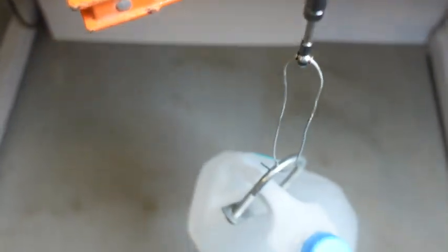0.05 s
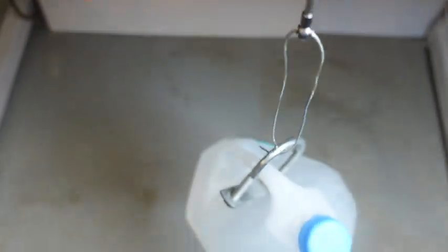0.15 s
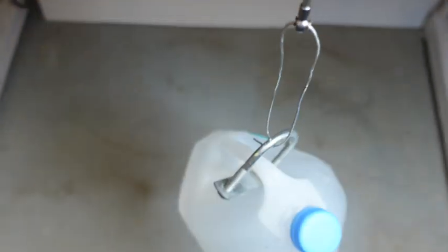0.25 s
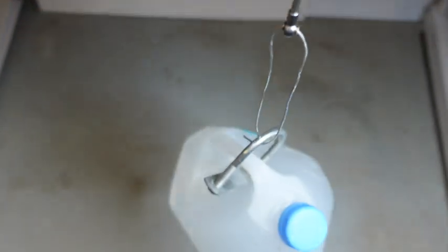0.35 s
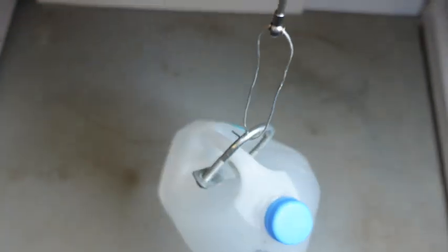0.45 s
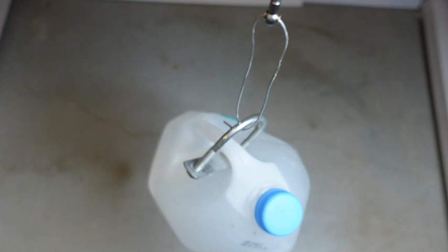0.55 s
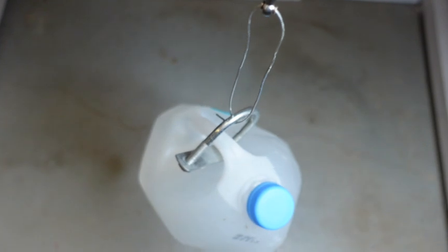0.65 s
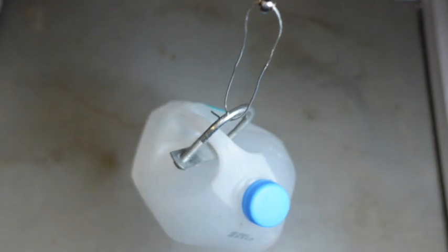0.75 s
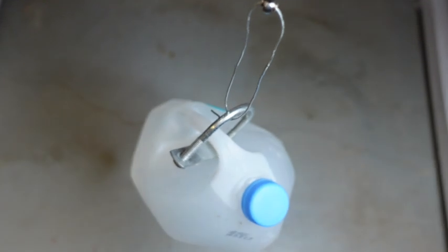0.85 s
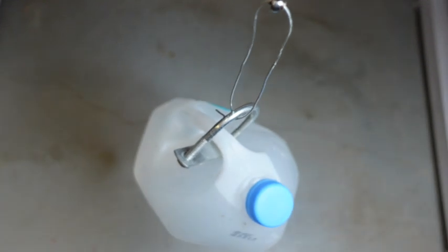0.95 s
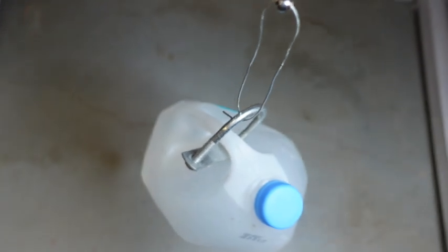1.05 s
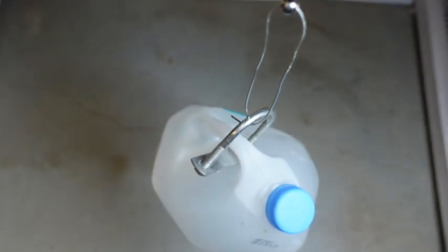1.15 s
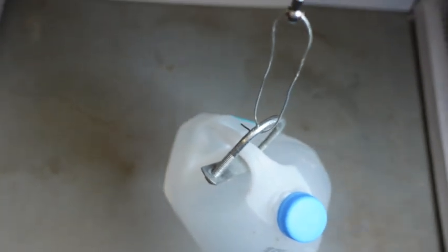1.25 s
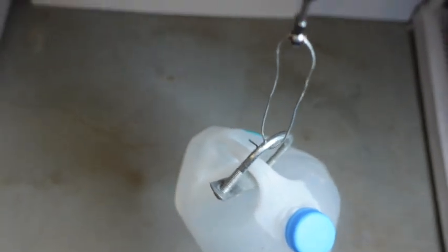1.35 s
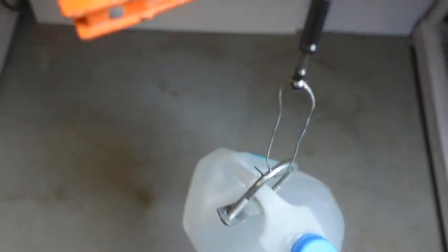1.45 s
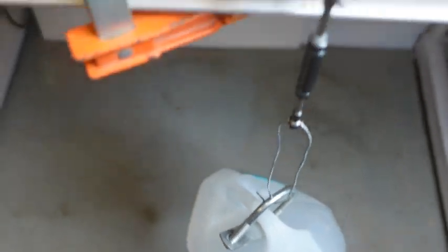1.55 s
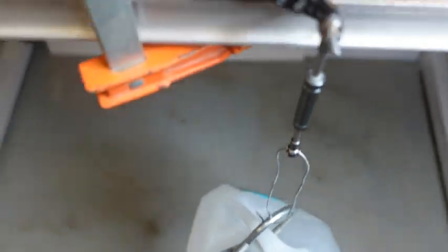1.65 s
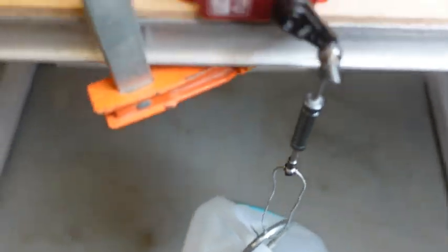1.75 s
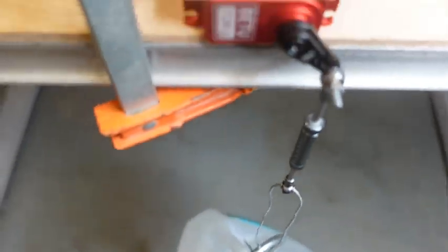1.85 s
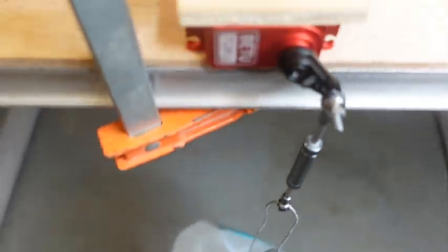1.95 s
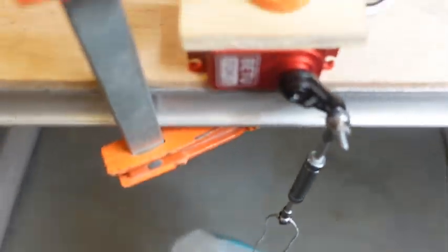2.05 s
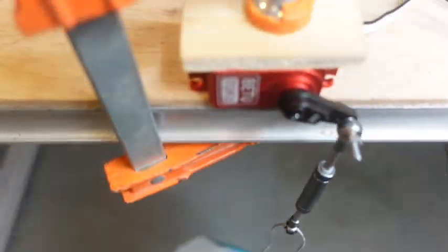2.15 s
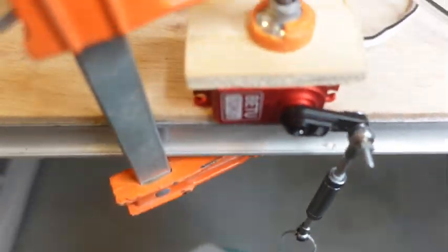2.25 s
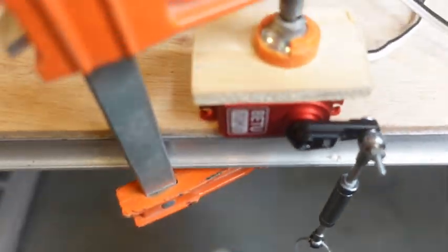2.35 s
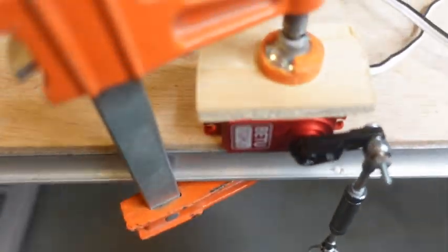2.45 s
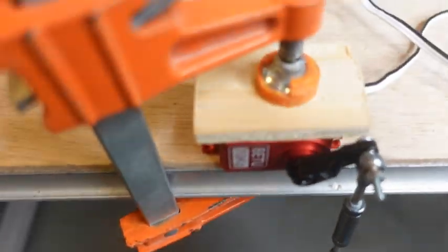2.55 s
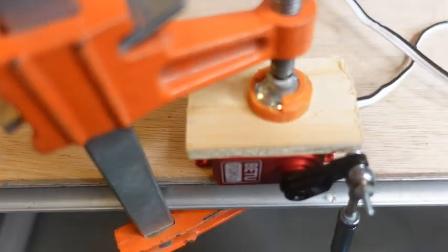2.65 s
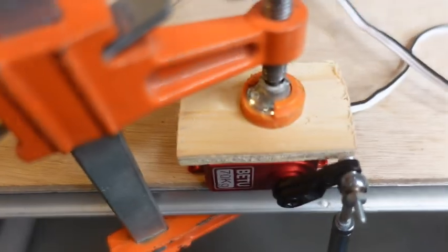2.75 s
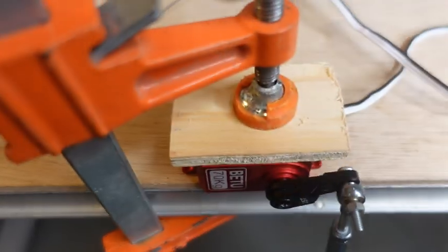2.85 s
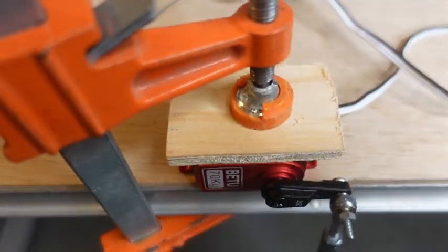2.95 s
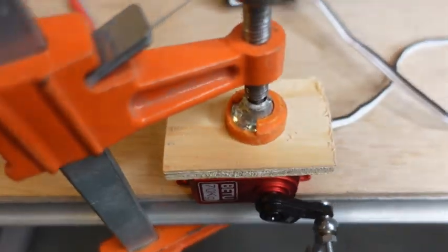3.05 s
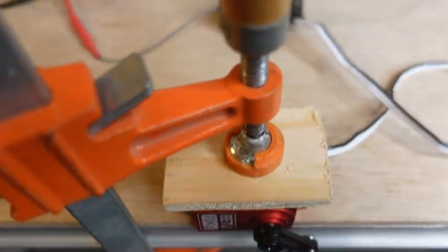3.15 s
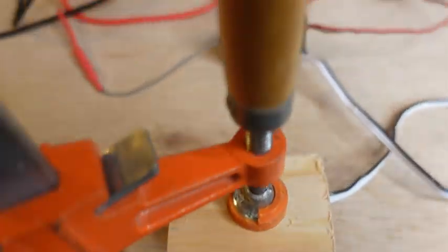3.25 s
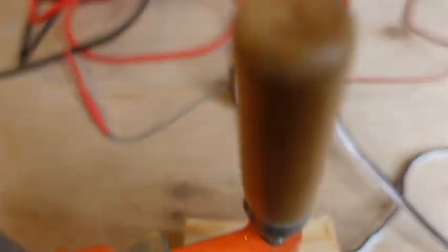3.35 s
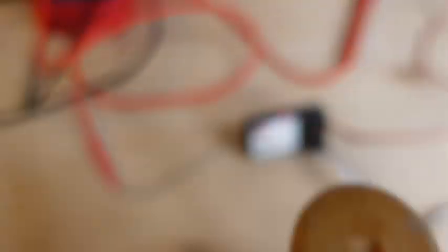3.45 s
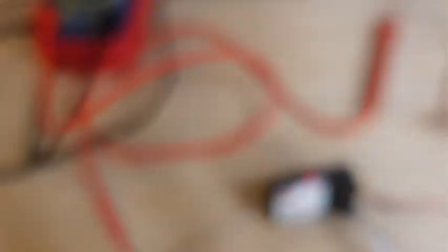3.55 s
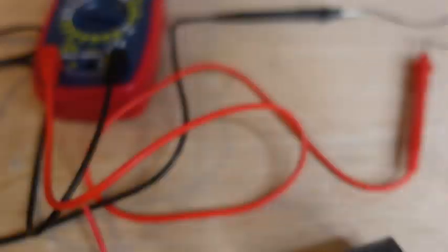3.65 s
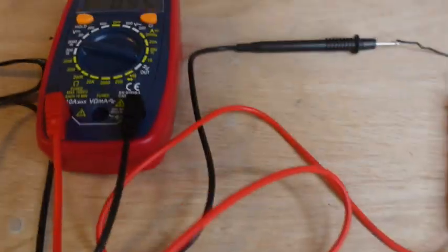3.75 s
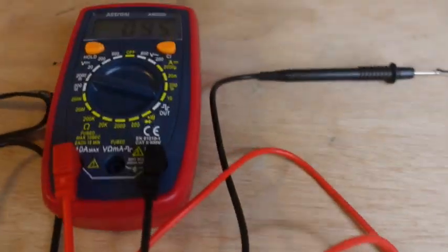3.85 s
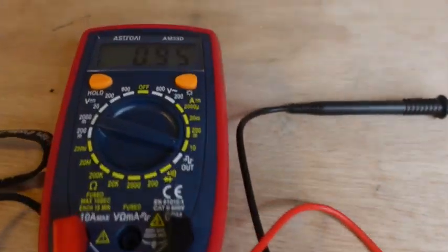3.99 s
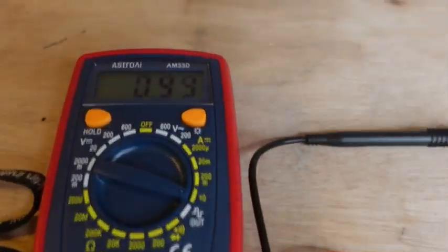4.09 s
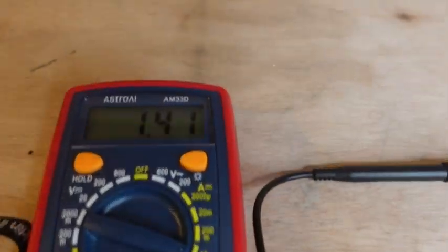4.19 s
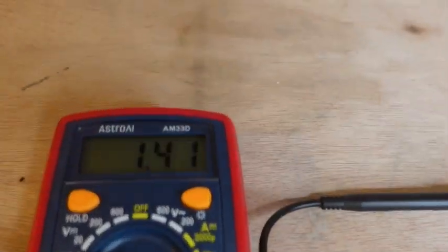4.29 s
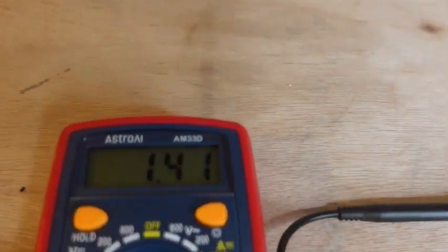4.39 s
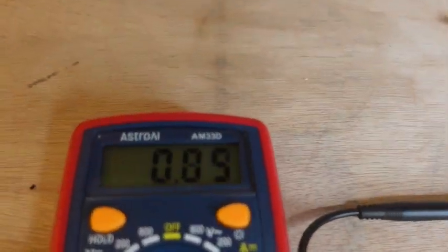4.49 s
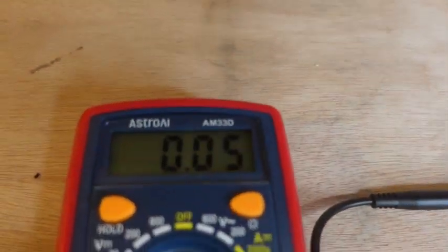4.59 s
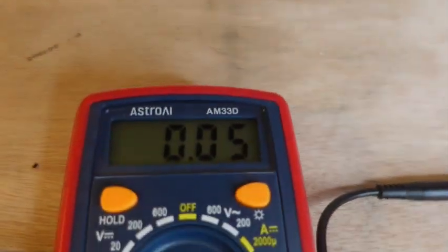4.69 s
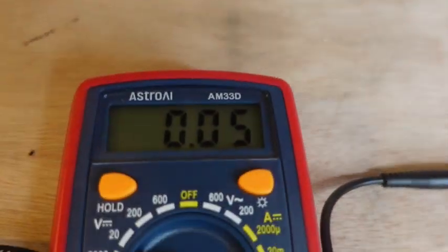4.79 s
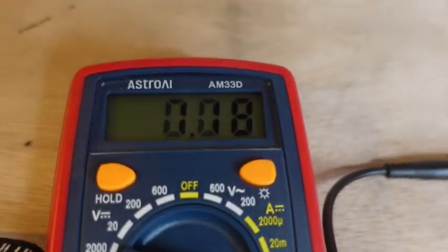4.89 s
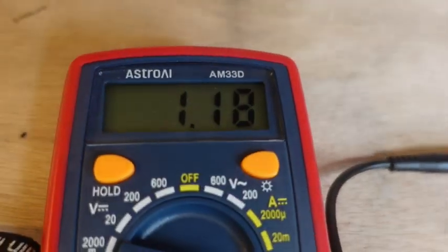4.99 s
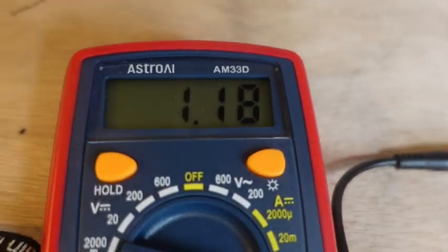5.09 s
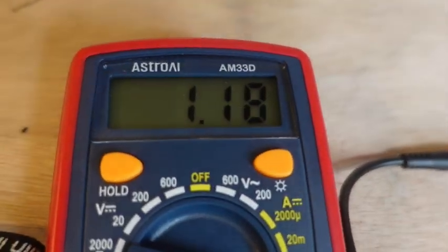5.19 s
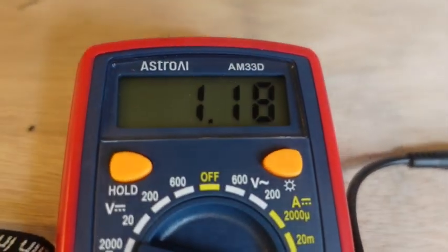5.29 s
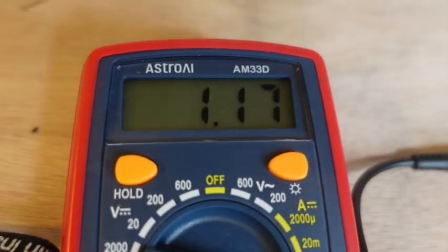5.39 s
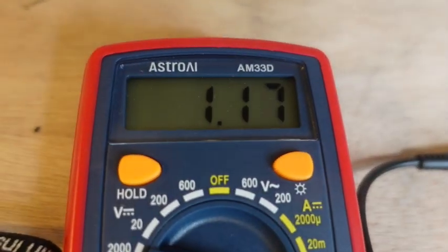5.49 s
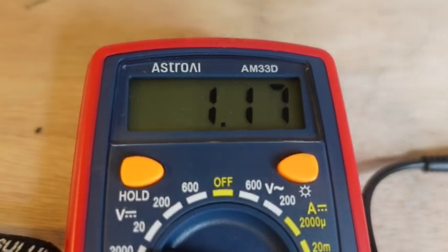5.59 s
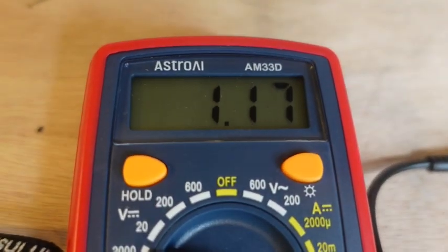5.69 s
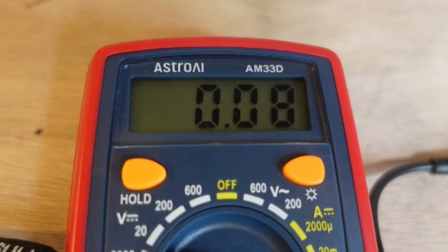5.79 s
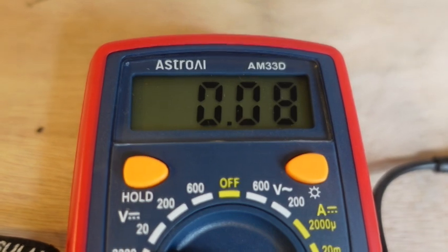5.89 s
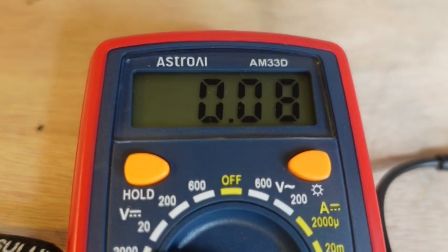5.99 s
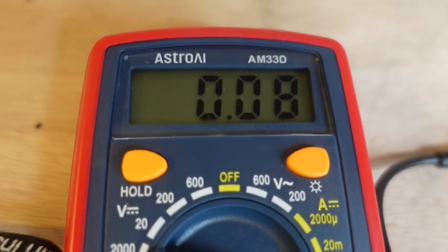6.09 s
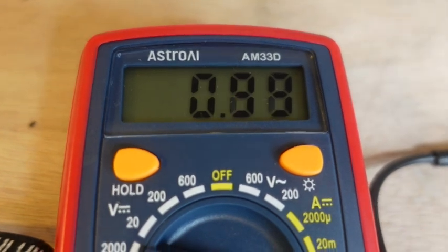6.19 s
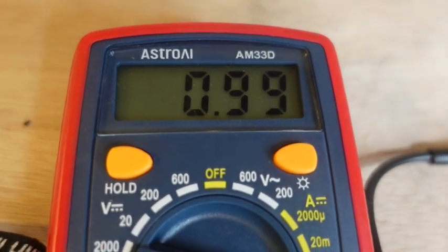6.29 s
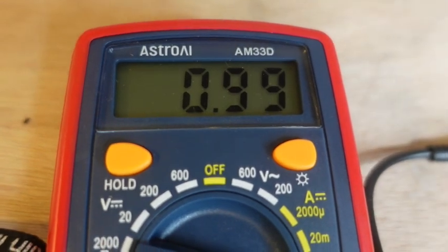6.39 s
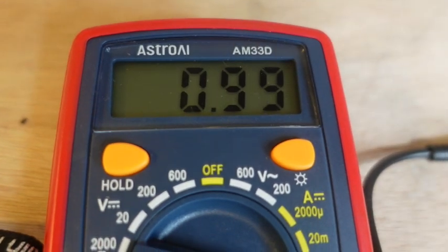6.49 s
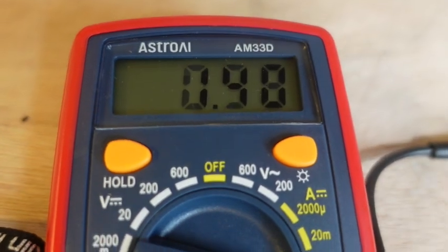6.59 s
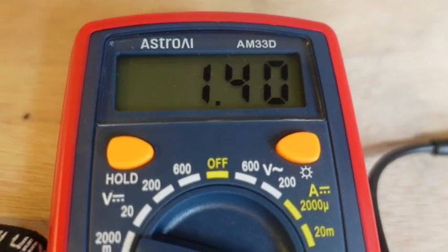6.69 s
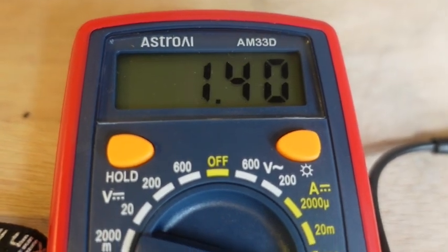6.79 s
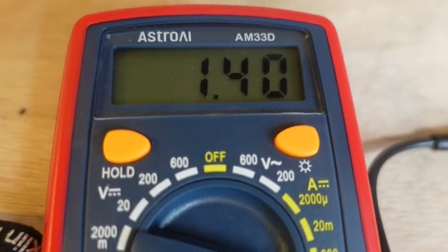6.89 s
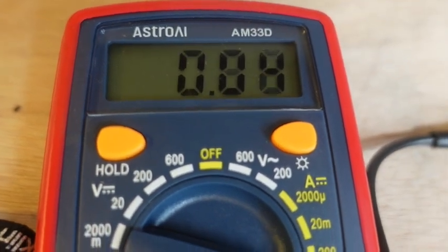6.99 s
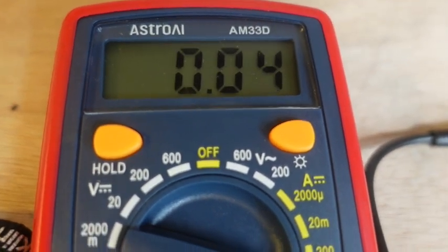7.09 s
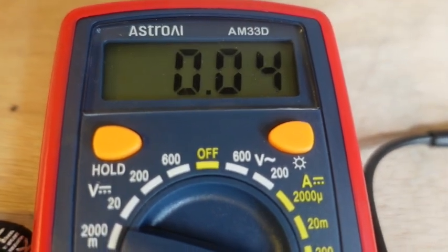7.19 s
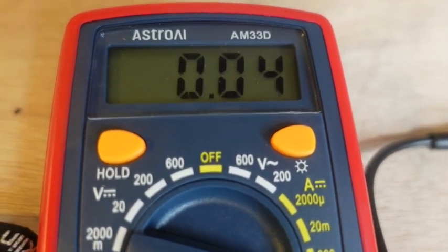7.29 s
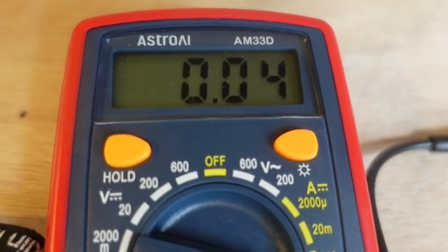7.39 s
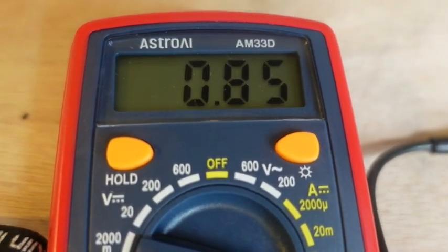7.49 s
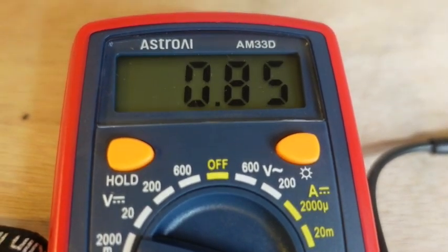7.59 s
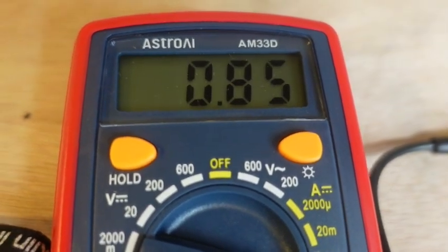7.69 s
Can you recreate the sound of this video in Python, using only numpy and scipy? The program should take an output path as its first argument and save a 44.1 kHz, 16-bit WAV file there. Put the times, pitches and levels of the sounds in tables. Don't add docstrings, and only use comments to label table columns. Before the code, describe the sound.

Close in a small workshop, a clamped servo makes quick gritty whirrs, about half a second each, lifting and lowering a water jug. Lowerings zip up high and chatter in two surges; lifts grind steadier and lower. Tiny gear clicks precede strokes, the bench hums faintly, and a thin squeal sits near the top of hearing. Halfway, the microphone turns away and the case tone changes.

```python
import sys
import numpy as np
from scipy import signal
from scipy.fft import rfft, irfft, next_fast_len
from scipy.io import wavfile
from scipy.ndimage import uniform_filter1d

SR = 44100
rng = np.random.default_rng(int(sys.argv[2]) if len(sys.argv) > 2 else 0)


def generate_wav(signal):
    frames = np.transpose(np.atleast_2d(signal))
    scaled = np.clip(frames, -1, 1) * 32767
    pcm = np.round(scaled).astype(np.int16)
    wavfile.write(sys.argv[1], SR, pcm)


def decibels_to_gain(level_db):
    exponent = np.asarray(level_db, float) / 20
    return 10 ** exponent


N = 341368
T = np.arange(N) / SR

# start in seconds, spin-up in seconds, stop in seconds, coasting time in seconds, level in dB.
STROKES = [(-.5, .05, -.07, .31, -22), (.14, .05, .465, .18, -17), (.81, .068, 1.305, .1, -16.5),
           (1.345, .055, 1.68, .19, -17), (1.99, .115, 2.535, .26, -15.5), (2.775, .045, 3.15, .17, -16),
           (3.35, .23, 3.965, .22, -16), (4.085, .1, 4.435, .19, -17), (4.64, .11, 5.175, .18, -13.5),
           (5.318, .04, 5.715, .2, -16), (5.962, .095, 6.495, .24, -15.5), (6.655, .04, 6.98, .18, -15.5),
           (7.245, .11, 7.9, .2, -15)]
# first surge in seconds, last surge in seconds, first surge in Hz, whine in dB.
LIFTS = [(.91, 1.29, 1800, -32.5), (2.08, 2.51, 1580, -34), (3.52, 3.93, 1520, -33),
         (4.78, 5.15, 1780, -34), (6.1, 6.49, 1780, -33), (7.38, 7.77, 1720, -33)]
# share of the lift (0 to 1), Hz.
LIFT_SPEED = [(.11, 1580), (.27, 1655), (.37, 1515), (.46, 1585), (.64, 1445), (.74, 1455), (.82, 1570),
              (.9, 1530), (1, 1630)]
# first surge in seconds, its Hz, second surge in seconds, its Hz, whine in dB.
LOWERINGS = [(.25, 3500, .375, 2950, -26), (1.41, 2700, 1.55, 2400, -32), (2.895, 2950, 3.12, 2450, -37),
             (4.215, 3400, 4.39, 3000, -34), (5.41, 2400, 5.63, 2480, -42), (6.75, 3370, 6.885, 2800, -32)]
# time in seconds, gears in dB, bench in dB, brightness in dB.
CAMERA = [
    (0, 0, -2, 1),
    (3.2, 0, 0, -3),
    (3.58, 0, 2, -5),
    (3.85, -6, 6, 3),
    (4.3, -6, 8, 4),
    (7.7, -6, 7, 7),
]
TURN_S = (3.38, 3.7)
# multiple of the tooth rate, level in dB.
OVERTONES = [(2, -3), (3, -1), (4, -13), (5, -19), (6, -6), (7, -7)]
# Hz, width in Hz, level in dB.
WALL_MODES = [(1616, 122, 0.5), (2420, 350, 2.5), (2900, 310, -5.5), (3400, 220, 3)]
# Hz, width in Hz, level in dB.
CASE_FACING = [(1600, 81, -23.5), (2300, 50, -12), (2620, 62.2, -25.5), (3530, 91, -13.5), (3563, 48, -3.5),
               (3924, 158, 2.5), (4290, 29, 3), (4730, 117, 5.5), (4936, 50, -5.5), (5500, 17, -6),
               (5920, 45, -3), (6530, 280, -3), (7414, 140, -6.5), (7960, 110, -9), (8850, 150, -26),
               (9480, 190, -20.5), (10940, 330, -25.5)]
# Hz, width in Hz, level in dB.
CASE_AWAY = [(1600, 240, -21.5), (2250, 51, -15.5), (3533, 58, -1), (3891, 19, 3), (4210, 24, 0),
             (4752, 64, 1.5), (4942, 99, -0.5), (5640, 17, -28.5), (6070, 51, -8.5), (6564, 46, -6.5),
             (7880, 60, -23.5), (7630, 120, -15.5), (8900, 40, -19), (9500, 260, -22), (11900, 700, -30)]
# Hz, level in dB.
CASE_WALL = [(290, -62), (500, -1.5), (851, -29), (914, -43), (1350, -31), (1600, -32.5), (1900, -22),
             (2760, -21.5), (3480, -9), (4770, -0.5), (5750, -11), (6740, -14), (15500, -47)]
# dB under full drive, brightness in dB.
BRIGHT_COASTING = [(-40, 8), (-20, 1), (-4, 0)]
BRAKE_DB = [-37, -40, -39, -46, -38, -42]
# time in seconds, level in dB.
HOLDING = [(0, -44), (1.3, -43), (2.2, -50), (2.8, -45), (3.6, -56), (7.74, -52)]
# Hz, width in Hz, level in dB.
BOARD_MODES = [(225, 137, 0.5), (322, 13, -16.5), (406, 17, 3.5), (576, 27, 1), (647, 46, -5.5)]
# Hz, width in Hz, level in dB.
LEG_MODES = [(100, 28, -8.5), (146, 33, 5.5)]
# Hz, width in Hz, level in dB.
PLATE_MODES = [(785, 25, -6.5), (927.6, 26, 0)]
# Hz, level in dB.
AIR = [(15, -77.5), (25, -38), (64, -12), (173, -11), (631, -15.5), (703, -15.5), (997, -15), (3170, -23),
       (4870, -19), (12800, -31), (15500, -50)]
# time in seconds, peak in dB.
TICKS = [(0.1074, -11), (0.7861, -25), (0.8064, -24), (1.8133, -33.5), (1.8694, -34), (1.9435, -25),
         (1.9809, -44), (2.0108, -22.5), (2.7536, -19), (3.3393, -25), (4.121, -19), (4.6274, -25),
         (5.9484, -46), (7.2324, -24), (7.2749, -27)]
# time in seconds, half length in seconds, level
# in dB.
RUSTLES = [
    (3.386, 0.051, -47.5),
    (4.552, 0.12, -54.5),
]
# time in seconds, peak in dB, Hz.
KNOCKS = [(4.349, -33.5, 268), (5.218, -28, 141), (6.465, -24, 159), (6.906, -30, 234.5), (7.547, -30, 135),
          (7.626, -25, 155)]

LIFT_END_HZ = 1450
DRIVE_HZ, LOOP_HZ = 15350, 250
PINION_TEETH = 11


def unit(x):
    return x / np.sqrt(np.mean(x ** 2))


def curves(table):
    s, *columns = np.transpose(table)
    return [np.interp(T, s, column) for column in columns]


def walk(rate):
    k = int(SR / rate)
    held = np.repeat(rng.standard_normal(N // k + 1), k)
    return 1.3 * uniform_filter1d(uniform_filter1d(held, k), k)[:N]


def waver(rate, depth):
    return 1 + depth * (walk(rate) + 1j * walk(rate))


def ring(x, modes):
    total = 0
    for k, (hz, width, db) in enumerate(modes):
        b, a = signal.iirpeak(hz, hz / width, SR)
        total = total + (-1) ** k * decibels_to_gain(db) * signal.lfilter(b, a, x)
    return total


def colour(x, spectrum):
    hz, db = np.transpose(spectrum)
    size = next_fast_len(N)
    log_hz = np.log(np.fft.rfftfreq(size, 1 / SR) + 1)
    return irfft(rfft(x, size) * decibels_to_gain(np.interp(log_hz, np.log(hz), db)), size)[:N]


def band(x, lo_hz, hi_hz):
    return signal.sosfilt(signal.butter(3, [lo_hz, hi_hz], "band", fs=SR, output="sos"), x)


def away():
    return np.interp(T, TURN_S, [0, 1])


def effort():
    under, full = [], []
    for start, rise_s, stop, coast_s, db in STROKES:
        rise = 45 * np.maximum(1 - (T - start) / rise_s, 0) ** 2
        coast = 65 * (1 - np.exp(-(np.maximum(T - stop, 0) / coast_s) ** 1.3))
        under.append(-rise - coast)
        full.append(db + 3 * (np.clip(T, start, stop) - stop))
    stroke = np.argmax(under, axis=0)
    under_db = uniform_filter1d(np.max(under, axis=0), SR // 100)
    return under_db, under_db + np.choose(stroke, full) + curves(CAMERA)[0]


def lowering_points(a, hz_a, b, hz_b, whine_db):
    caught_db, run_out_db = 4, -13
    points = [(a - .08, 1700, 0), (a, hz_a, 0), ((a + b) / 2, .69 * hz_a, caught_db),
              (b, hz_b, caught_db), (b + .14, 1800, run_out_db)]
    return [(s, hz, whine_db + db, 12.5 - max(db, 0) * 1.5) for s, hz, db in points]


def lift_points(first, last, first_hz, whine_db):
    edge_s, over_db = .085, (11, 7)
    rows = []
    for share, hz in [(-edge_s / (last - first), 1250), (0, first_hz), *LIFT_SPEED]:
        tone_db = whine_db - 5 * max(1 - share / .3, 0)
        rows.append((first + share * (last - first), hz, tone_db, np.interp(share, [0, 1], over_db)))
    rows.append((last + edge_s / 2, LIFT_END_HZ, whine_db, over_db[1]))
    return rows


def mesh_controls():
    rows = []
    for down, up in zip(LOWERINGS, LIFTS):
        rows += lowering_points(*down) + lift_points(*up)
    return curves(rows)


def lowering(weights, edge_s):
    inside = np.zeros(N)
    for weight, (start, rise_s, stop, *_) in zip(weights, STROKES[1::2]):
        inside += weight * ((T > start + rise_s) & (T < stop))
    return uniform_filter1d(inside, int(edge_s * SR))


def rested():
    idle = np.zeros(N)
    for down, up in zip(STROKES[1::2], STROKES[2::2]):
        idle += (T > down[2]) & (T < up[0] - .04)
    return uniform_filter1d(idle, SR // 50)


def case(x):
    modes = np.sqrt(1 - away()) * ring(x, CASE_FACING) + np.sqrt(away()) * ring(x, CASE_AWAY)
    return modes + decibels_to_gain(-3) * colour(x, CASE_WALL)


def tooth_knocks(turns, level_db):
    slow = np.clip((-30 - level_db) / 20, 0, 1)
    spot = (turns / PINION_TEETH % 1 * 256).astype(int) + 256 * (turns / (8 * PINION_TEETH)).astype(int)
    worn = rng.standard_normal(N)[spot % N]
    scatter_db = 2.34 + 0.83 * slow
    knocks = rng.standard_normal(N) * decibels_to_gain(scatter_db * rng.exponential(size=N))
    knocks *= rng.random(N) < .3 - .27 * slow
    knocks = unit(knocks) + .75 * (1 - slow) * worn
    knocks /= np.sqrt(uniform_filter1d(knocks ** 2, SR // 20) + 1e-9)
    throb = 1 + 0.2 * np.sin(2 * np.pi * turns / PINION_TEETH)
    return knocks * throb * decibels_to_gain(1.17 * walk(30) + 1.01 * walk(120))


def rattle(hz, turns, under_db, level_db):
    loose = case(tooth_knocks(turns, level_db))
    fizz_db = -11 + curves(CAMERA)[2] + 13 * (np.clip(hz, 2000, 2700) - 2000) / 1000
    fizz_db = fizz_db - 4 * rested() + np.interp(under_db, *np.transpose(BRIGHT_COASTING))
    body_db = -17.5 + 6.7 * (np.minimum(hz, 2600) - 1600) / 1000 + np.interp(T, TURN_S, [0, 5.5])
    body = decibels_to_gain(body_db + 2 * walk(25)) * unit(band(loose, 1000, 3300))
    core = unit(band(loose, 3300, 5460))
    fizz = decibels_to_gain(fizz_db + 1.2 * walk(35)) * unit(band(loose, 7670, 14500))
    return decibels_to_gain(level_db - 0.5) * (body + core + fizz)


def fundamental(mesh, rough):
    tone = np.imag(waver(260, 1.4 * rough) * np.exp(1j * mesh))
    return decibels_to_gain(2 + 5 * rough * walk(35)) * tone


def overtones(mesh, rough):
    even_db = np.interp(rough, [.4, .9], [-8, 0])
    total = 0
    for k, db in OVERTONES:
        level_db = db + 3 * walk(40) + (1 - k % 2) * even_db
        total = total + decibels_to_gain(level_db) * np.imag(waver(200, rough) * np.exp(1j * k * mesh))
    return total


def gears(under_db, level_db):
    hz, tone_db, over_db = mesh_controls()
    hz = uniform_filter1d(hz, SR // 60)
    rough = np.interp(hz, [1700, 2400], [.4, .9])
    turns = np.cumsum(hz * (1 + .008 * walk(60))) / SR
    mesh = 2 * np.pi * turns + .6 * rough * np.sin(2 * np.pi * turns / PINION_TEETH)
    surge_db = np.clip(70 * (hz / uniform_filter1d(hz, SR // 6) - 1), -12, 6)
    surge_db = surge_db * np.interp(rough, [.4, .9], [1, .35])
    contact = decibels_to_gain(1.3 * under_db + tone_db - 7.5 + surge_db)
    whine = contact * fundamental(mesh, rough)
    whine = ring(whine, WALL_MODES) + decibels_to_gain(-8.5) * whine
    over = contact * decibels_to_gain(over_db + 11) * case(overtones(mesh, rough))
    return rattle(hz, turns, under_db, level_db) + whine + over


def drive(level_db):
    braking = lowering(np.ones(len(LOWERINGS)), .03)
    hz = DRIVE_HZ - .15 * (uniform_filter1d(mesh_controls()[0], SR // 20) - LIFT_END_HZ)
    steady = np.sin(2 * np.pi * np.cumsum(hz + 25 * walk(46)) / SR)
    steady = lowering(decibels_to_gain(np.array(BRAKE_DB)), .03) * decibels_to_gain(3.05 * walk(50)) * steady
    chop = np.exp(-((T * LOOP_HZ) % 1 - .5) ** 2 / .09) * decibels_to_gain(5 * walk(35))
    held = unit(chop * np.sin(2 * np.pi * np.cumsum(DRIVE_HZ + 55 * walk(300)) / SR))
    resting_db = np.clip(1.2 * (level_db + 22), -30, 0) * rested()
    held = (1 - .7 * braking) * decibels_to_gain(curves(HOLDING)[0] + resting_db) * held
    return np.sqrt(2) * steady + held


def bench_hum(level_db):
    down = lowering(np.ones(len(LOWERINGS)), .2)
    resting_db = np.clip(level_db + 30, -30, 0)
    board_db = -59.5 + 11 * down + curves(CAMERA)[1] + 0.2 * resting_db
    legs_db = -15 * down
    plate_db = 2.5 - 12 * down + 0.45 * resting_db + 2 * walk(12)
    shake = rng.standard_normal((3, N)) * decibels_to_gain(2.5 * walk(25))
    board = unit(ring(shake[0], BOARD_MODES))
    legs = unit(band(ring(shake[1], LEG_MODES), 80, 250))
    rumble = decibels_to_gain(-22) * unit(band(shake[1], 18, 60))
    plate = unit(band(ring(shake[2], PLATE_MODES), 650, 1100))
    return decibels_to_gain(board_db) * (board + decibels_to_gain(legs_db) * legs + rumble + decibels_to_gain(plate_db) * plate)


def workshop_tail(near):
    t = np.arange(SR // 3) / SR
    tails = rng.standard_normal((2, len(t))) * np.exp(-np.log(1000) * t / .18) * (t > .002)
    tails /= np.linalg.norm(tails, axis=1, keepdims=True)
    b, a = signal.butter(1, [200, 7000], "band", fs=SR)
    wet = signal.fftconvolve(signal.lfilter(b, a, near)[None], tails, axes=1)[:, :N]
    return decibels_to_gain(-9.5) * wet


def quiet_air():
    mid = unit(colour(rng.standard_normal(N), AIR))
    side = unit(colour(rng.standard_normal(N), AIR))
    return decibels_to_gain(-58) * (mid + decibels_to_gain(-14) * side * np.array([[1], [-1]]))


def ticks():
    x = np.zeros(N)
    for s, db in TICKS:
        for k in range(5):
            x[int((s + .0016 * k) * SR)] += decibels_to_gain(db - 1.1 * k)
    return decibels_to_gain(9) * case(x) + decibels_to_gain(-3.5) * band(x, 4500, 14000) + decibels_to_gain(6) * band(x, 14800, 16500)


def soft_rustles():
    swell = sum(decibels_to_gain(db) * np.exp(-((T - s) / half) ** 2) for s, half, db in RUSTLES)
    return swell * unit(band(rng.standard_normal(N) * decibels_to_gain(3.2 * walk(170)), 1100, 3600))


def soft_knocks():
    x = np.zeros(N)
    for s, db, hz in KNOCKS:
        t = np.maximum(T - s, 0)
        x += decibels_to_gain(db + 4.5) * np.sin(2 * np.pi * hz * t) * t / 0.004 * np.exp(-t / 0.0041)
    return x


def scene():
    under_db, level_db = effort()
    near = gears(under_db, level_db) + drive(level_db) + bench_hum(level_db)
    near = near + ticks() + soft_rustles() + soft_knocks()
    return near + workshop_tail(near) + quiet_air()


def top_cut(x):
    return signal.sosfilt(signal.butter(12, 16870, fs=SR, output="sos"), x)


def record(dry):
    low_pass = signal.ellip(8, .3, 60, 15560, fs=SR, output="sos")
    mix = signal.sosfilt(low_pass, np.tanh(dry))
    return top_cut(mix)


dry = scene()
out = record(dry)
generate_wav(out)
```